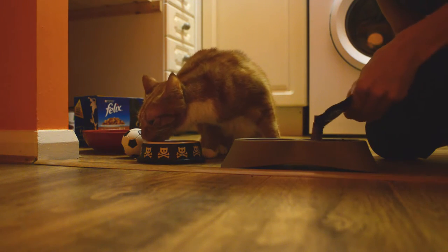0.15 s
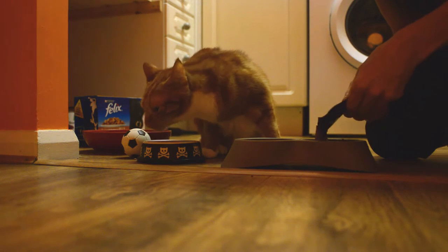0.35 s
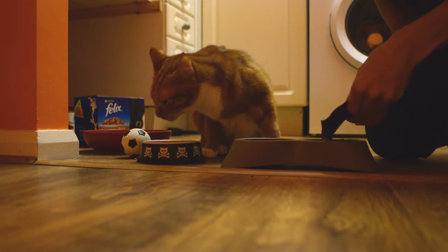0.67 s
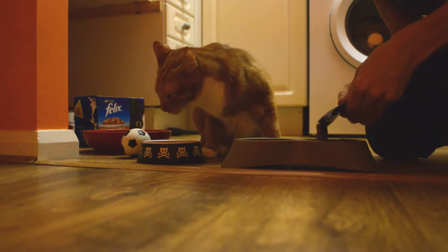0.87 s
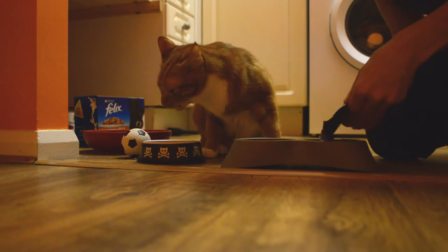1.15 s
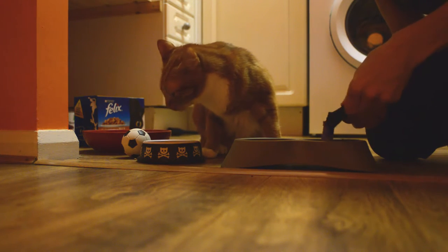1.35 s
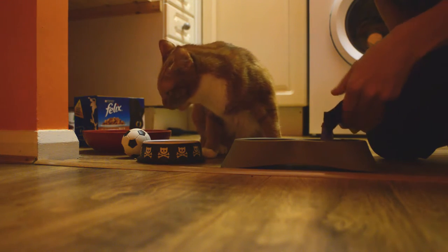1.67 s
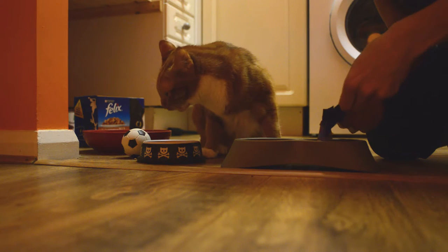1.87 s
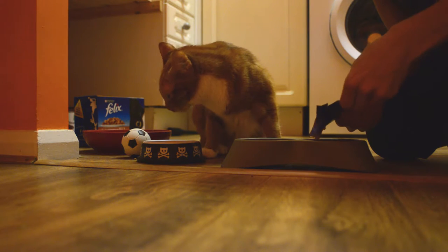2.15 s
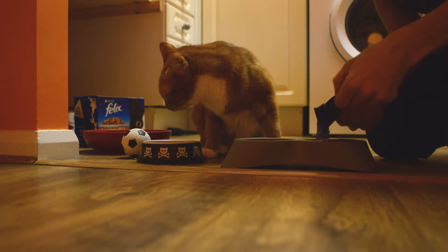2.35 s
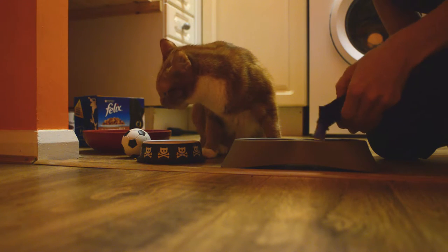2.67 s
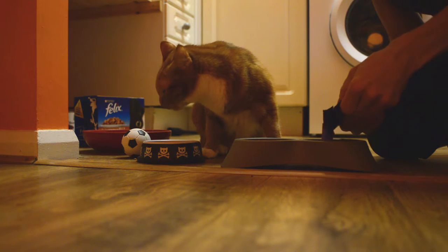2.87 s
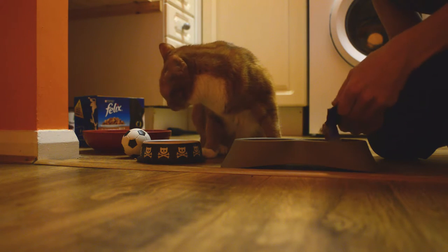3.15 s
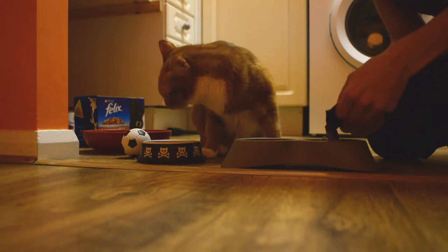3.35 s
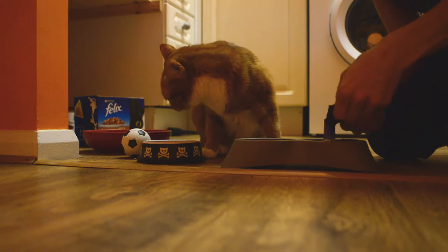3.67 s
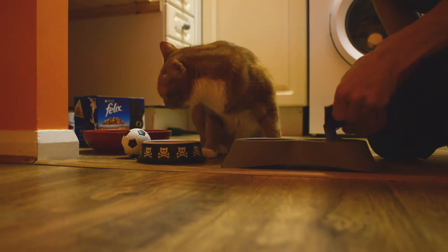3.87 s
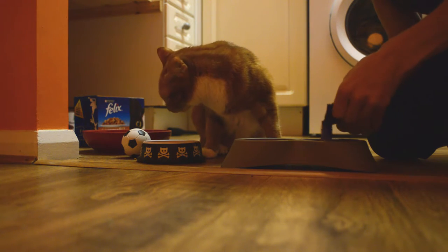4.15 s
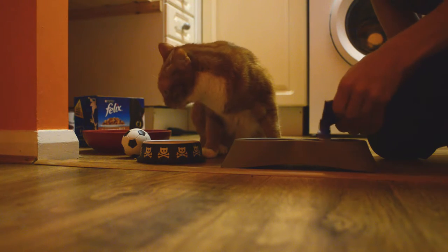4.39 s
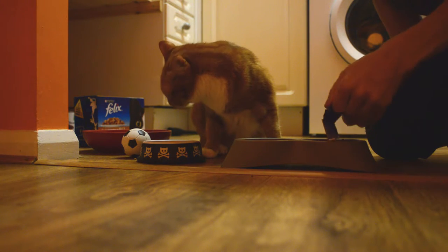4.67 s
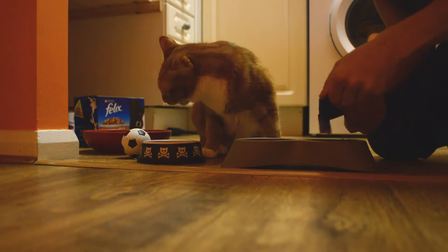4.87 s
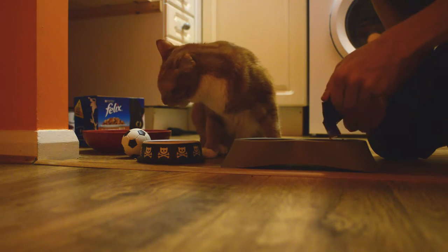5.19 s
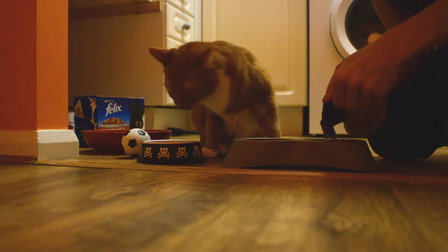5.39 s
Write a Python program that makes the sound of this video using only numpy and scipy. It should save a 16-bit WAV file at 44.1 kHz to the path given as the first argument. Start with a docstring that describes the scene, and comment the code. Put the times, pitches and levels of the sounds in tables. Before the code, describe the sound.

Wet cat food is squeezed from a crinkly foil pouch over a plastic bowl. Bright crackles come in the first second and a half, moist squelches between them, then quieter wet lip smacks from a nearby cat and small foil ticks. The last part bursts into loud, crowded snaps. Short room reflections follow each sound; a steady faint appliance hum and room air continue, picked up close to the floor.

```python
"""The dying tail of an earlier snap opens the scene: a hand is squeezing a foil pouch of cat food.
Wet food squelches over a plastic bowl; foil facets flip in sharp snaps, thickest in a loud run at the end.
From a second and a half in, the cat's lips smack: saliva ticks and a ringing mouth cavity.
Throughout, creases rustle and faint chewing ticks over sine-wave appliance hum and filtered-noise air.
Cupboard echoes and a decaying noise tail follow snaps, squelches and smacks; the rustle gets the room only."""
import sys
import numpy as np
from scipy import signal
from scipy.fft import rfft, irfft
from scipy.io import wavfile
from scipy.ndimage import uniform_filter1d

SR = 44100
rng = np.random.default_rng(int(sys.argv[2]) if len(sys.argv) > 2 else 0)


def generate_wav(signal):
    """Clip the signal to [-1, 1] and save it as 16-bit WAV at the path in sys.argv[1]."""
    frames = np.transpose(np.atleast_2d(signal))
    scaled = np.clip(frames, -1, 1) * 32767
    pcm = np.round(scaled).astype(np.int16)
    wavfile.write(sys.argv[1], SR, pcm)


N = 243873  # length in samples

SIZE = 2048  # samples in one short sound
BIN_HZ = np.arange(SIZE // 2 + 1) * SR / SIZE
AGE_MS = np.arange(SIZE) * 1000 / SR
TAIL_S = np.arange(24576) / SR


# Buckles of the pouch:
# [t/s, level/dB before make-up gain, tilt/dB per octave, facet f/Hz, crumple time/ms]
SNAPS = [(0.234, -25.5, 2, 3000, 1.2), (0.949, -31, 2, 4400, 1.2), (1.278, -32.5, 2.5, 9250, 1.8),
         (1.293, -29, -1, 2770, 2), (1.638, -42.5, -1, 3300, 4.7), (1.645, -35, 1, 4300, .8),
         (1.801, -44.5, 2.6, 10000, .7), (2.105, -42.5, -2.5, 4100, 2), (2.118, -42.5, 2, 5370, 0.87),
         (3.166, -46, 3.5, 8800, 5.5), (3.391, -43, -2.8, 1640, 6.3), (3.437, -49.5, 4.5, 9300, 4.3),
         (3.556, -41, 3, 9100, 6), (3.571, -43, 0.7, 6300, 5.8), (3.675, -57, 9, 11700, 4.1),
         (4.153, -36, 1.6, 5000, 4.5), (4.224, -40, 0.2, 1910, 1.6), (4.266, -44.5, -1, 4480, 0.56),
         (4.463, -44, -1, 3500, 0.75), (4.548, -50, -3, 9750, 4.4), (4.713, -47, 0.5, 3650, 1.4),
         (4.766, -42.5, -2, 1760, 2), (4.777, -45.5, 0, 4420, 1), (4.858, -37.5, 0.5, 5560, 10),
         (4.887, -25.5, -0.5, 10060, 1.1), (4.938, -32.5, -2.5, 1660, 2.5), (4.975, -37.5, -2.5, 1440, 4),
         (5.032, -24, 0, 1830, 2.7), (5.166, -27, -1, 1710, 2.9), (5.188, -28, .5, 4830, 1.6),
         (5.381, -41, -3.5, 3380, 4.6), (5.403, -26.5, 1.5, 3300, 2.4), (5.426, -34.5, -2.5, 4770, 2.6),
         (5.507, -25.5, -1.4, 1620, 0.7)]
# Tone of the foil, shared by all snaps: [f/Hz, level/dB]
FOIL_TONE = [(60, -34), (250, -14.5), (500, -11), (900, -0.5), (2050, -0.5), (4600, -1.5), (9500, -1.4),
             (10700, -4.5), (12300, -16.5), (14400, -24), (16000, -29)]
TILT_PIVOT_HZ = 4000
# The facet's ring at the pivot; big, low facets ring more
FACET_RING_DB, FACET_DB_PER_OCTAVE = 4.2, -1.2
# Later flips against the first, for a 1 ms crumple; slow crumples swell
CASCADE_DB, CASCADE_DB_PER_DOUBLING = 5, 7
SNAP_ECHO_DB, SNAP_ROOM_DB = -1, 2
# Snaps above this table level open up the top treble
HARD_DB = -36
SPARKLE_HZ, SPARKLE_DB_PER_DB = 11700, 0.87


def pouch(gain_db=27.5, facet_octaves=.45, travel_s=.0008):
    """Each snap rings the facet that flipped: big ones knock, small ones tick, hard ones sparkle."""
    out = np.zeros(N)
    octaves = np.log2(np.maximum(BIN_HZ, 500) / TILT_PIVOT_HZ)
    top = 1 / (1 + (SPARKLE_HZ / (BIN_HZ + 1)) ** 16)
    for s, db, tilt_db, hz, ms in SNAPS:
        ring_db = FACET_RING_DB + FACET_DB_PER_OCTAVE * np.log2(hz / TILT_PIVOT_HZ)
        facet = ring_db * resonance(hz, facet_octaves)
        sparkle = SPARKLE_DB_PER_DB * max(db - HARD_DB, 0) * top
        tone_db = on_log_axis(BIN_HZ, FOIL_TONE) + tilt_db * octaves + facet + sparkle + folds(2.6)
        body = causal(undb(tone_db + db + gain_db))
        cascade_db = CASCADE_DB + CASCADE_DB_PER_DOUBLING * np.log2(max(ms, .5))
        snap = burst(ms, cascade_db, SNAP_ECHO_DB, SNAP_ROOM_DB)
        add(out, s + travel_s, signal.fftconvolve(snap, body))
    return out


def rustle(per_s=600, spread_db=5, gain_db=-7):
    """Tiny creases give way as random clicks, densely enough to merge into a rustle."""
    tone = [(200, 9.5), (900, 5.5), (2000, 7.5), (4500, 7.5), (10000, 4.0), (13000, -14), (16000, -24)]
    clicks = (rng.random(N) < per_s / SR) * rng.choice([-1, 1], N)
    sizes = undb(spread_db * np.minimum(rng.exponential(size=N), 3))
    grains = colour(clicks * sizes, tone) * creasing() * undb(gain_db)
    # the creases are heard directly and in the room's ring
    return grains + undb(-1.0) * signal.fftconvolve(grains, room_ring())[:N]


# Level of the rustle: the dying tail of an earlier snap at first, then foil sliding
# under the fingers; breakpoints of a fader: [t/s, level/dB before trim]
RUSTLE = [(0, -38.5), (.08, -58.5), (.8, -60.5), (1.2, -50), (1.9, -63.5), (2.5, -57), (2.9, -61),
          (3.7, -56.5), (4.0, -63.5), (4.56, -53.5), (4.7, -57.5), (5.53, -49)]
CREASE_DB = -21  # swell of creases relative to its snap's table level
CREASE_RISE_S, CREASE_FALL_S = .008, .035


def creasing():
    """Strength of the creases: an earlier snap's tail, then the fingers' sliding, and a swell per snap."""
    t = np.arange(N) / SR
    power = undb(np.interp(t, *np.transpose(RUSTLE))) ** 2
    for s, db, *_ in SNAPS:
        distance = np.maximum((s - t) / CREASE_RISE_S, (t - s) / CREASE_FALL_S)
        swell = np.exp(-distance.clip(max=20))
        power += (undb(db + CREASE_DB) * swell) ** 2
    return np.sqrt(power)


# Soft wet food giving way: [t/s, level/dB before make-up gain, air pocket f/Hz]
SQUELCHES = [(0.074, -51.5, 1090), (0.339, -39, 2180), (0.462, -46, 2270), (0.668, -53, 1080),
             (0.729, -53.5, 2500), (0.775, -47.5, 2200), (0.866, -56, 1370), (1.004, -58, 2200),
             (1.177, -40.5, 1530), (1.227, -47, 950), (2.079, -41.5, 1090), (2.468, -45.5, 1000),
             (2.951, -57, 5230), (3.143, -46.5, 2860), (3.253, -54.5, 2200), (3.369, -50, 700),
             (4.031, -39, 2800), (4.065, -45, 3150), (4.309, -48, 1240), (4.431, -49, 2900),
             (5.129, -41, 850), (5.153, -41, 1500), (5.288, -41, 920), (5.328, -44, 1300)]
# Tone of the wet food, shared by all squelches: [f/Hz, level/dB]
FOOD_TONE = [(60, -73), (330, -5), (840, 1.5), (2050, 2.5), (4600, -7), (7000, -17.5), (11000, -31)]
POCKET_DB, POCKET_OCTAVES = 6, 0.99  # height and width of an air pocket's resonance


def squelches(gain_db=28.5, travel_s=0.00054):
    """Wet food tears in slower, duller bursts with small hollow resonances."""
    out = np.zeros(N)
    for s, db, hz in SQUELCHES:
        pocket = POCKET_DB * resonance(hz, POCKET_OCTAVES)
        body = causal(undb(on_log_axis(BIN_HZ, FOOD_TONE) + pocket + folds(3.5) + db + gain_db))
        tear = burst(3.5, cascade_db=10, echo_db=-7, tail_db=-2.5)
        add(out, s + travel_s, signal.fftconvolve(tear, body))
    return out


# Parting of the cat's lips:
# [t/s, mouth ring level/dB, saliva tick level/dB], both before make-up gain
SMACKS = [(1.502, -42.5, -47), (1.534, -53, -47), (1.553, -63, -42), (1.751, -54, -57), (1.964, -74, -48),
          (2.012, -75, -48), (2.25, -48, -51), (2.332, -34.5, -41), (2.507, -54, -49.5), (2.571, -50, -46),
          (2.588, -46.5, -51), (2.611, -42.5, -45.5), (2.717, -56, -57), (3.091, -62, -53.5),
          (4.133, -45, -52)]
# Tone of a saliva tick: [f/Hz, level/dB]
SALIVA_TONE = [(300, -18), (1500, 3.5), (3000, -4.5), (4500, -3), (7500, -4), (9100, 7.5), (10800, 1),
               (12900, -4), (14300, -13), (16000, -24)]
MOUTH_HZ, MOUTH_SCATTER_OCTAVES = 1860, .08


def cat(ring_db=24, tick_db=25, overtone=1.45, overtone_db=-16, travel_s=0.00068):
    """A bursting saliva film ticks brightly and rings the small mouth cavity, whose pitch varies a little."""
    out = np.zeros(N)
    for s, mouth_db, saliva_db in SMACKS:
        hz = MOUTH_HZ * 2 ** (MOUTH_SCATTER_OCTAVES * rng.uniform(-0.71, 1))
        # here the peaks are plain gains, not dB
        upper = undb(overtone_db) * resonance(hz * overtone, octaves=.27)
        mouth = causal(resonance(hz, octaves=.27) + upper)
        spit = causal(undb(on_log_axis(BIN_HZ, SALIVA_TONE) + folds(3.4)))
        ring = signal.fftconvolve(burst(1.8, cascade_db=3, echo_db=-4, tail_db=-12), mouth)
        ticks = signal.fftconvolve(burst(2.0, cascade_db=0, echo_db=-1, tail_db=-1), spit)
        smack = undb(mouth_db + ring_db) * unit(ring) + undb(saliva_db + tick_db) * unit(ticks)
        add(out, s + travel_s, smack)
    return out


def chewing(per_s=13, level_db=-42, spread_db=7):
    """Faint wet ticks of the cat's jaws at random moments, each at its own pitch, with no room."""
    out = np.zeros(N)
    for when, pitch, size in rng.random((int(per_s * N / SR), 3)):
        hz = 1200 * 9 ** pitch
        peak = 1 / (1 + (4 * np.log((BIN_HZ + 1) / hz)) ** 2)
        body = unit(causal(undb(folds(4)) * peak))
        tick = signal.fftconvolve(crumple(6.6, cascade_db=7), body)
        add(out, when * N / SR, undb(level_db + spread_db * size) * tick)
    return out


def crumple(ms, cascade_db, soft_hz=3500):
    """One crisp flip sets off a cascade of softer ones; evened out to a broadly flat spectrum."""
    flips = rng.standard_normal(SIZE) ** 3 * np.exp(-AGE_MS / max(ms, .2))
    softened = signal.lfilter([1], [1, -np.exp(-2 * np.pi * soft_hz / SR)], flips)
    flips = undb(cascade_db) * unit(softened)
    flips[0] += 1
    spread = np.sqrt(uniform_filter1d(abs(rfft(flips)) ** 2, size=61))
    return unit(signal.fftconvolve(flips, causal(1 / spread))[:SIZE])


# Slaps off hard surfaces near the bowl: [delay/ms, level/dB before each source's echo trim]
ECHOES = [(4.4, -3.5), (11.1, -9), (12.4, -9.5)]


def burst(ms, cascade_db, echo_db, tail_db, echo_share=0.84):
    """A crumple, its slaps off the cupboards and the room's ring; every slap has its own mix of flips."""
    sound = undb(tail_db) * room_ring()
    add(sound, 0, crumple(ms, cascade_db))
    for delay_ms, db in ECHOES:
        add(sound, delay_ms / 1000, undb(db + echo_db) * crumple(ms * echo_share, cascade_db))
    return sound


# Ring of the kitchen by band: [centre f/Hz, t60/s]
KITCHEN = [(400, 0.27), (1100, 0.37), (2800, 0.41), (7000, 0.39), (11000, 0.33), (15000, 0.14)]


def room_ring(build_ms=0.88):
    """Reflections start grainy and merge into noise; each band dies at its own rate, the top one fastest."""
    ms = TAIL_S * 1000
    density = np.clip(ms / 40, .3, 1)
    hits = rng.random(len(ms)) < density
    scatter = rfft(rng.standard_normal(len(ms)) * hits / np.sqrt(density))
    hz = np.arange(len(scatter)) * SR / len(ms)
    centres, t60s = np.transpose(KITCHEN)
    tail = np.zeros(len(ms))
    # each share picks one band, crossfaded with its neighbours
    for share, t60 in zip(np.eye(len(centres)), t60s):
        band = irfft(scatter * on_log_axis(hz, np.c_[centres, share]))
        tail += band * np.exp(-np.log(1000) * TAIL_S / t60)
    return unit(tail * (1 - np.exp(-ms / build_ms)))


# Lines of the appliance hum: [f/Hz, nominal rms level/dB]
HUM = [(60, -72.5), (100.1, -53), (197, -74.5), (300.2, -66), (641, -73), (738, -74), (963, -77.5)]


def hum(waver_db=.2, motor_waver_db=1.2):
    """Mains and motor sine lines: the strongest holds nearly steady, the weak ones waver."""
    t = np.arange(N) / SR
    strongest_db = max(row[1] for row in HUM)
    out = np.zeros(N)
    for hz, db in HUM:
        walk = signal.resample(rng.standard_normal(size=24), N)
        depth_db = waver_db if db == strongest_db else motor_waver_db
        line = np.sin(2 * np.pi * (hz * t + rng.random()))
        out += np.sqrt(2) * undb(db + depth_db * walk) * line
    return out


# Tone of the still air and hiss: [f/Hz, relative level/dB per Hz]
AIR_TONE = [(25, -32), (45, -18), (65, -35), (90, -8.5), (160, 1.5), (310, 1), (480, -5), (700, -1.5),
            (1200, -7), (2400, -14), (5000, -25.5), (10000, -14), (13000, -20), (16000, -24)]


def still_air(level_db=-58.5):
    """Steady random noise shaped into the hush of the room."""
    return undb(level_db) * colour(rng.standard_normal(N), AIR_TONE)


def folds(depth_db):
    """Chance peaks and dips in dB, up to a few hundred hertz apart: crumpled shapes never ring alike."""
    knots = np.cumsum(np.linspace(90, 520, 56))
    return depth_db * np.interp(BIN_HZ, knots, np.clip(rng.standard_normal(len(knots)), -2, 2))


def resonance(hz, octaves):
    """A peak of height one and the given width, for each bin."""
    return 1 / (1 + (2 * np.log2((BIN_HZ + 1) / hz) / octaves) ** 2)


def causal(gain):
    """The quickest-starting (minimum-phase) response that has this gain in each bin."""
    cepstrum = irfft(np.log(gain + 1e-9))
    # fold the cepstrum forward in time
    cepstrum[1:SIZE // 2] *= 2
    cepstrum[SIZE // 2 + 1:] = 0
    return irfft(np.exp(rfft(cepstrum)))


def colour(x, points):
    """Filter a long sound by (f/Hz, level/dB) points, then scale it to rms 1."""
    hz = np.arange(len(x) // 2 + 1) * SR / len(x)
    y = irfft(rfft(x) * undb(on_log_axis(hz, points)), len(x))
    return y / np.std(y)


def on_log_axis(hz, points):
    """Read (f/Hz, value) points on a log-frequency axis."""
    f, value = np.transpose(points)
    return np.interp(np.log(hz + 1), np.log(f), value)


def undb(db):
    """Decibels to gain."""
    return 10 ** (np.asarray(db) / 20)


def unit(x):
    """Scale to an energy of one."""
    return x / np.sqrt(np.sum(x ** 2))


def add(track, s, x):
    """Mix x into the track at s seconds."""
    i = max(int(s * SR), 0)
    track[i:i + len(x)] += x[:max(len(track) - i, 0)]


def scene():
    """Pouch, food and cat over the hum and the still air of the kitchen."""
    foil = pouch() + rustle()
    animal = cat() + chewing()
    background = hum() + still_air()
    return (foil + squelches() + animal + background)[None]


def record(dry, low_cut_hz=42, top_hz=16000):
    """The microphone drops the deepest bass and cuts the top."""
    thinned = signal.sosfilt(signal.butter(4, low_cut_hz, "high", fs=SR, output="sos"), dry)
    return signal.sosfilt(signal.ellip(10, .2, 70, top_hz, fs=SR, output="sos"), thinned)


dry = scene()
out = record(dry)
generate_wav(out)
```